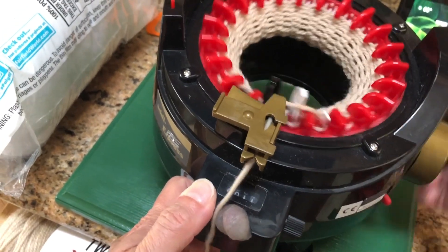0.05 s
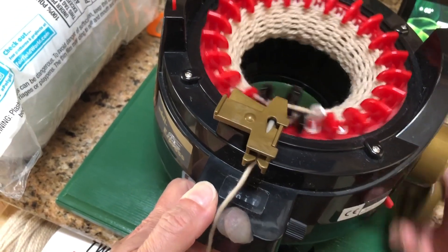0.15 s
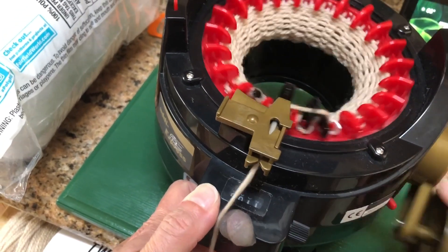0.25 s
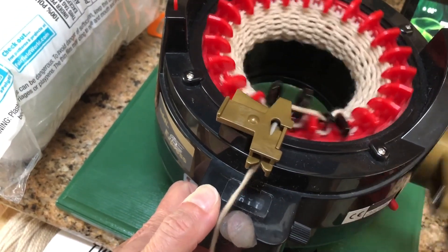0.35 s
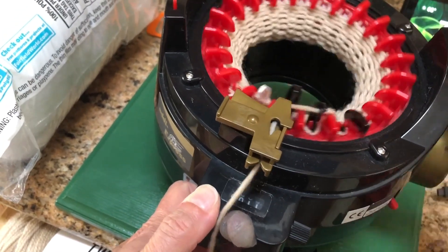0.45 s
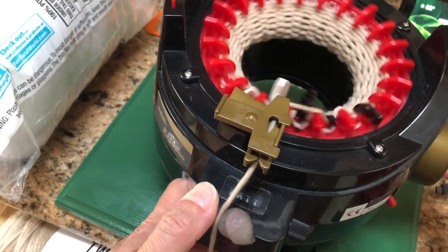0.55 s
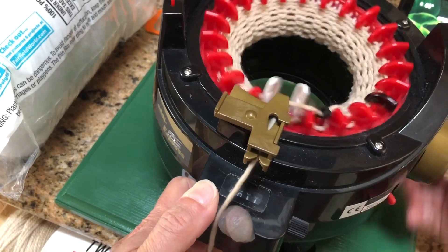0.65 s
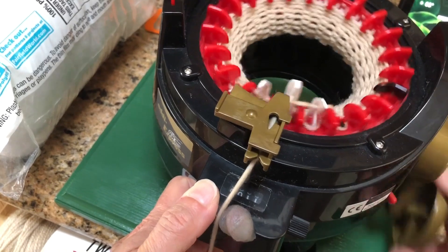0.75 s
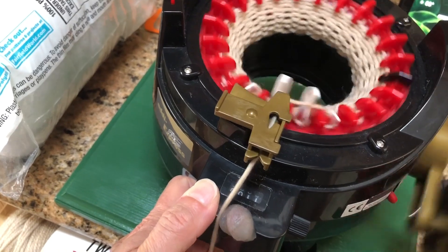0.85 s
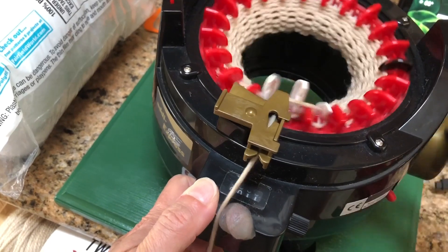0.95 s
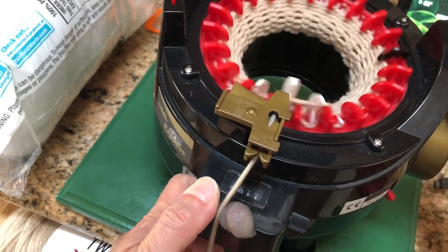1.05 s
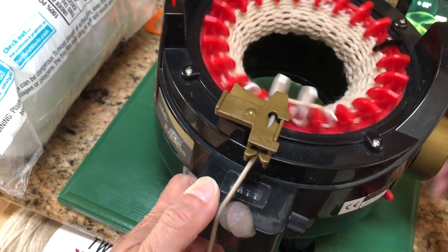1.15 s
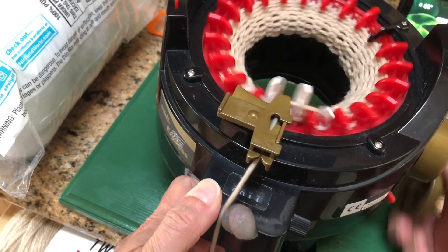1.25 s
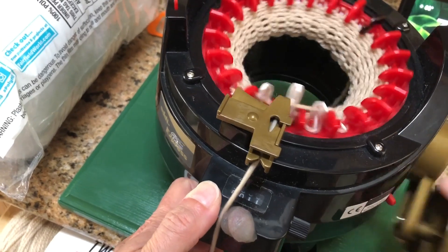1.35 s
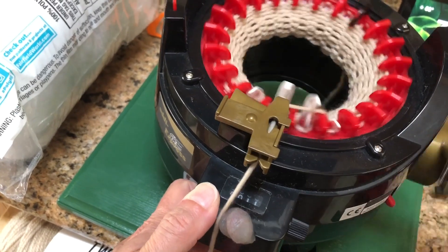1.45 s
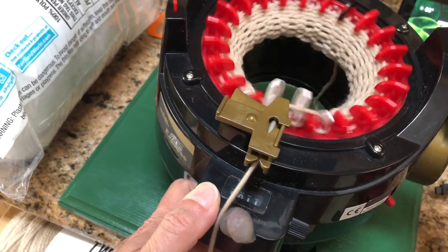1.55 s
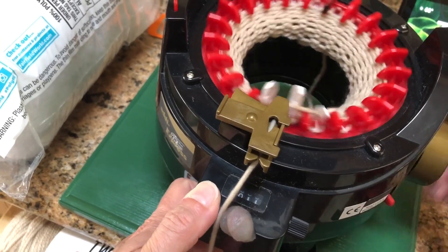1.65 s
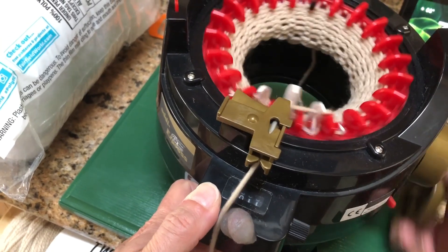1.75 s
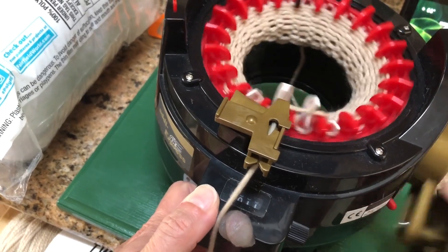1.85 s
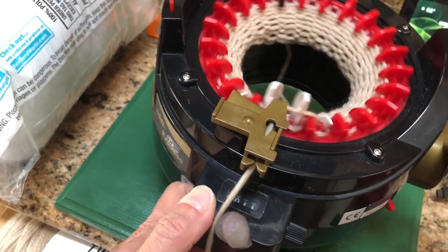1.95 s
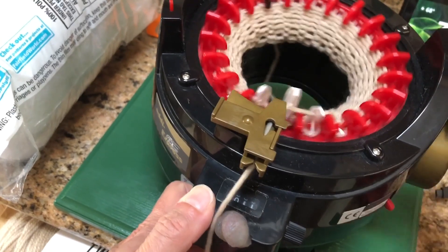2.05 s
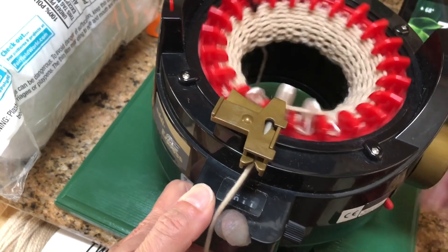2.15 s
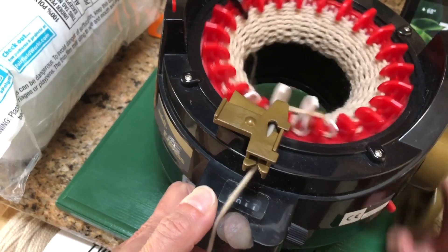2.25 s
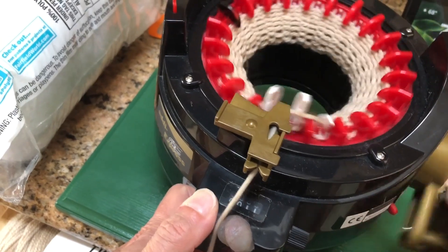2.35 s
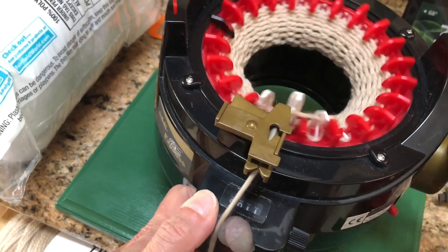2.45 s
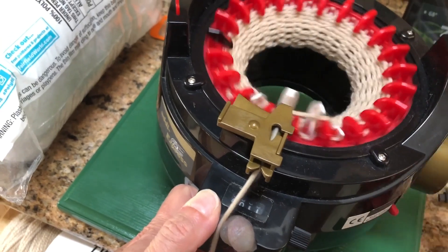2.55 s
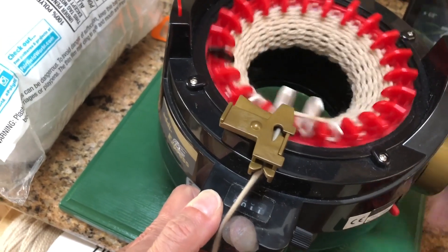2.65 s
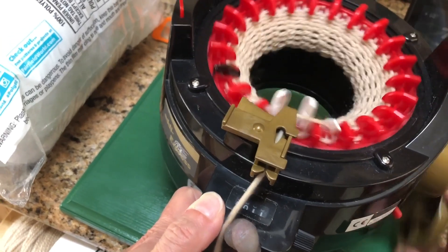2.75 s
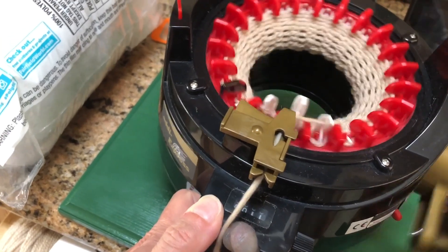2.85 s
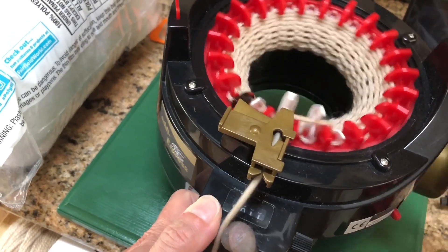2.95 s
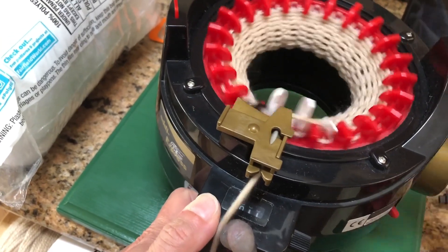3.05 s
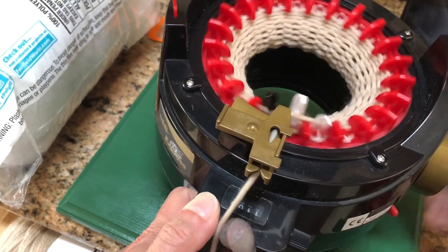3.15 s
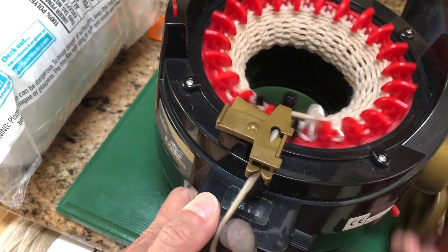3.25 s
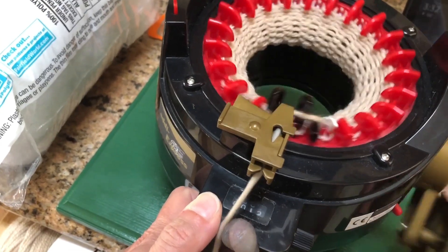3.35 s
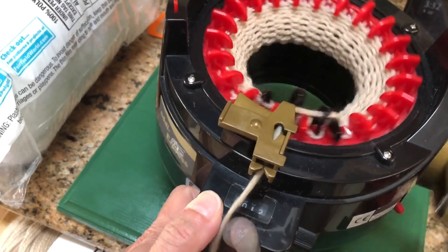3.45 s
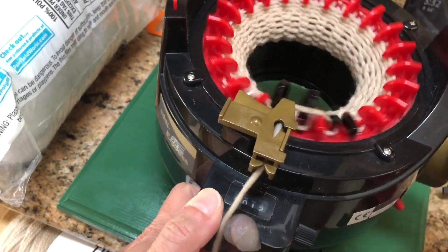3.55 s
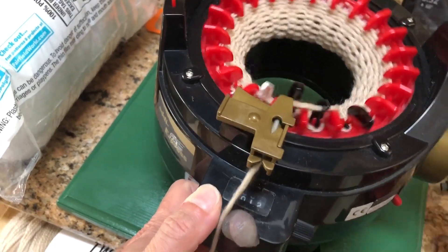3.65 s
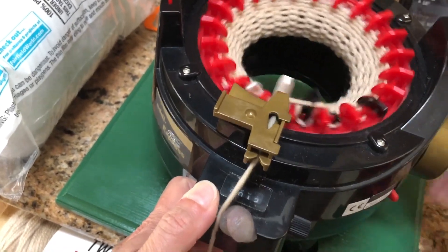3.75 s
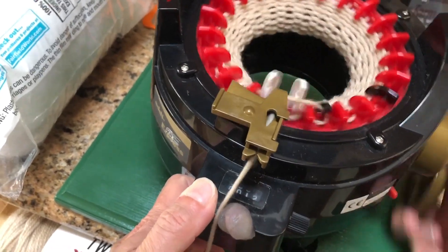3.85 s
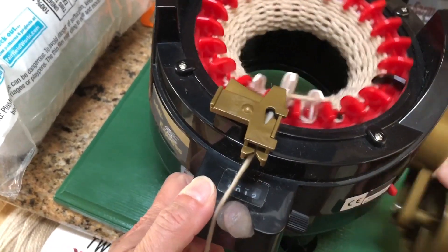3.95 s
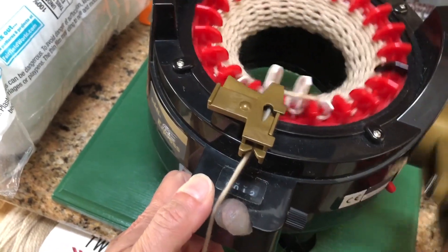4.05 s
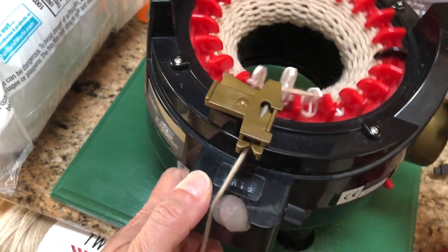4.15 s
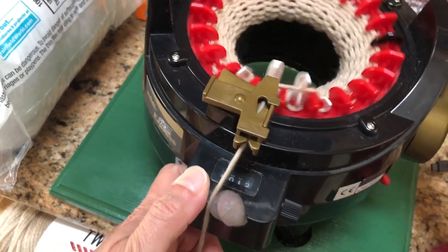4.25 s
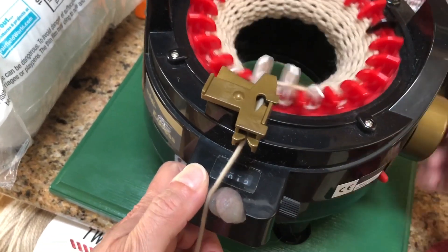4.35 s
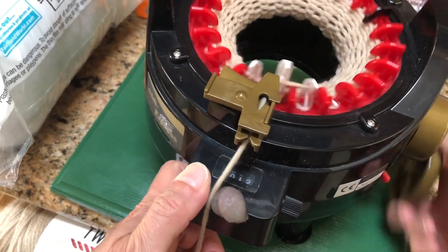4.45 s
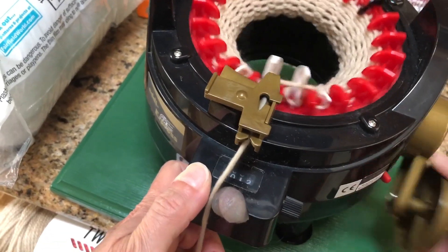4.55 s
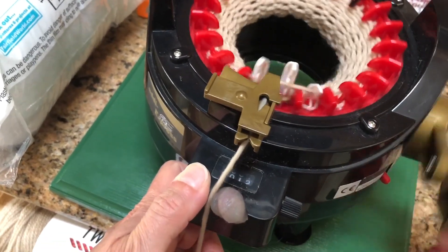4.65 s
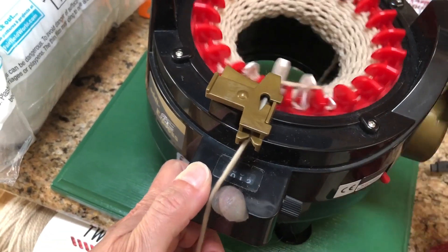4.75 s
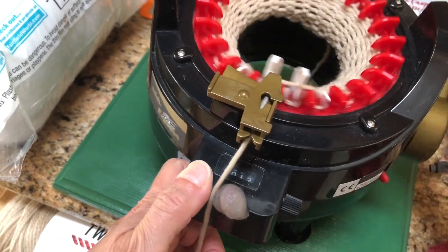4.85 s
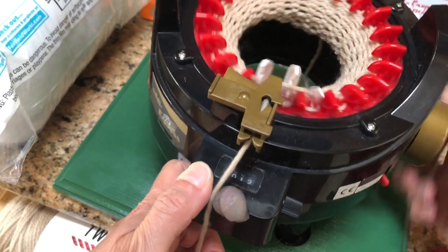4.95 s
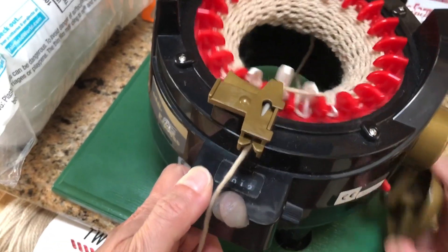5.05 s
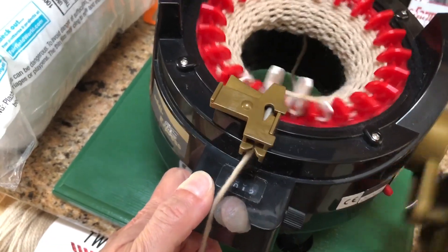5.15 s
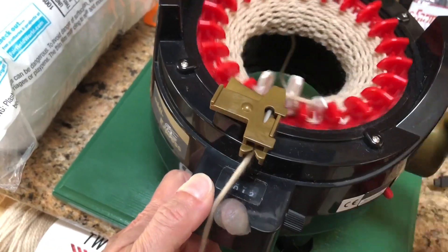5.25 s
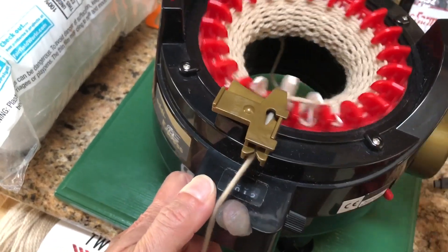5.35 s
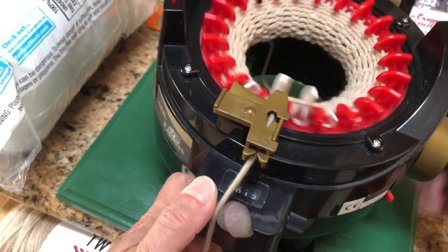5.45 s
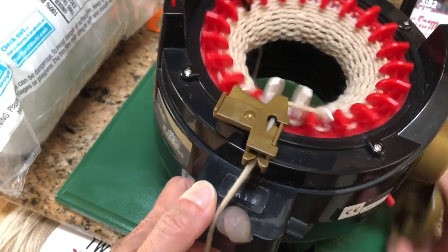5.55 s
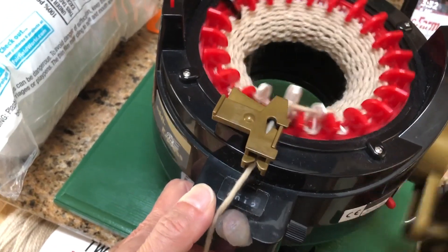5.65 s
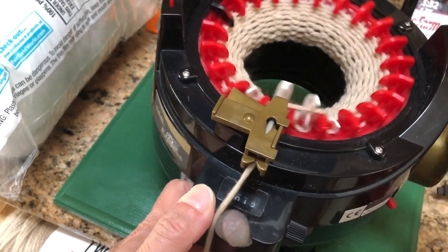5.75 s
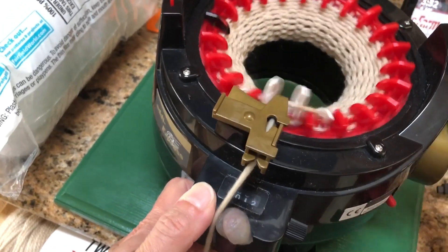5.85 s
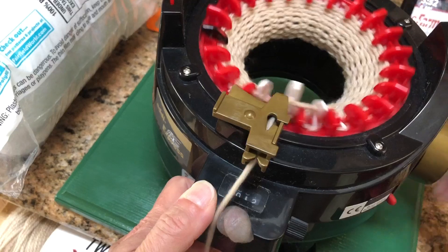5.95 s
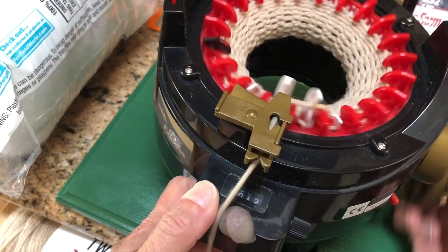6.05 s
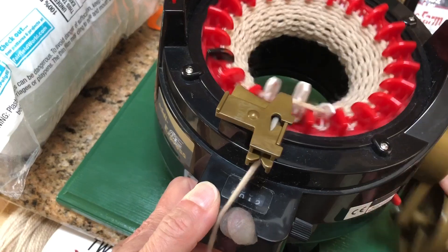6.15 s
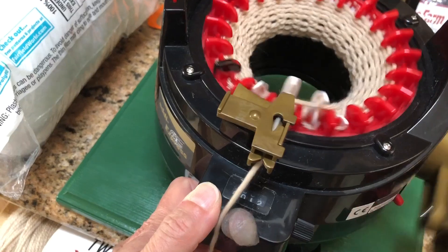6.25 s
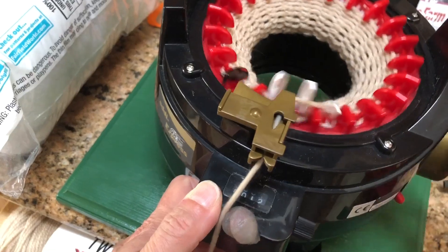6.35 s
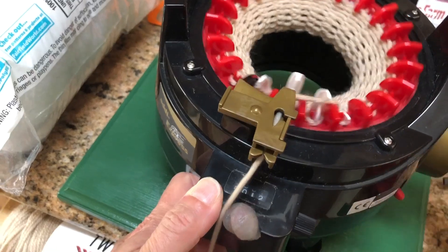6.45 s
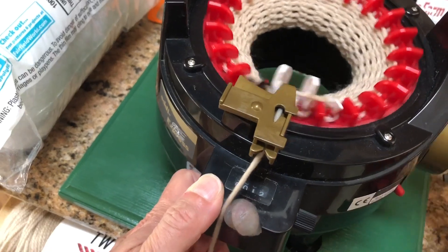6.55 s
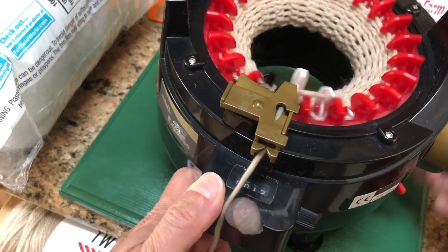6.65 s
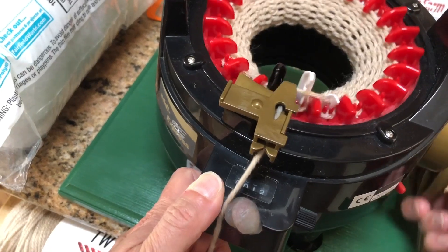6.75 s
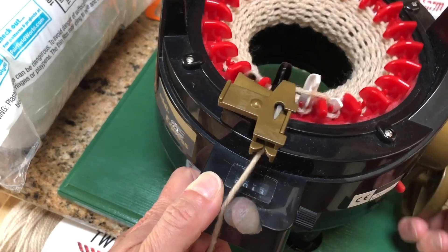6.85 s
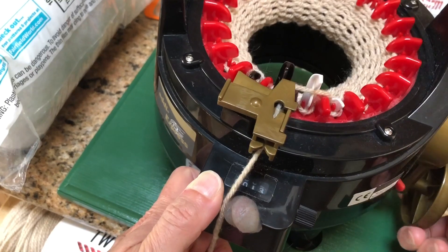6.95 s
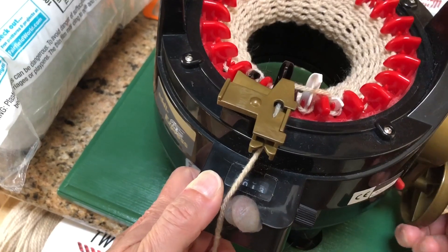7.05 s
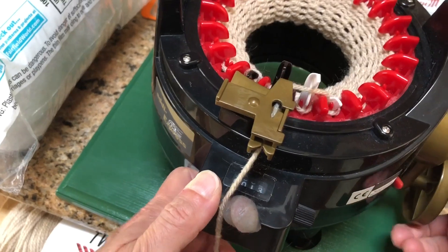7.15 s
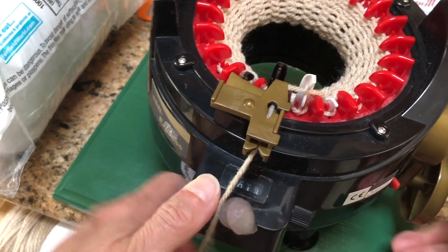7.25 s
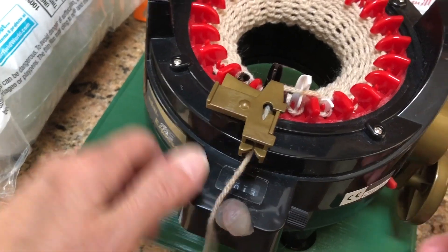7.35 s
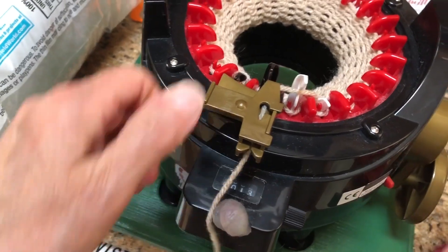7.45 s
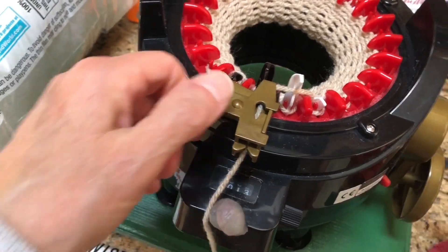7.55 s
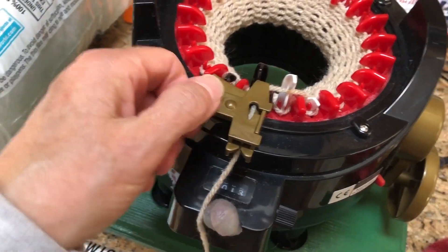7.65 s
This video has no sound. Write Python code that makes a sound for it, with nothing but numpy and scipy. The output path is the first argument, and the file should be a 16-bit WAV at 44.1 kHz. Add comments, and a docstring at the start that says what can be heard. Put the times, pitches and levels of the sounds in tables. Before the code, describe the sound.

Dry, clattering plastic machinery heard from close by, already turning at the start. Slightly irregular sharp clicks ride on rattling, rubbing and low rumble that swell with each push of the crank. Two hard snaps, about three seconds apart, jump well above the rest. Near the end the motion dies suddenly, with tiny ticks in a small quiet room with short faint reflections.

```python
"""Hook ticks, a gear knock and sharp needle clicks are heard first: a small plastic circular knitting
machine is cranked by hand, about seven needles a second passing the cam, heard from close by.
Stick-slip bursts and blows excite resonant plastic; filtered noise makes the rubbing, rumble and air.
The row counter snaps over twice; after a last double click the crank stops and a few faint ticks remain."""
import sys
import numpy as np
from scipy import signal
from scipy.fft import rfft, irfft
from scipy.io import wavfile
from scipy.ndimage import uniform_filter1d

SR = 44100
rng = np.random.default_rng(int(sys.argv[2]) if len(sys.argv) > 2 else 0)


def master_out(mix):
    """Clip the mix to full scale and print it as 16-bit PCM to the path in sys.argv[1]."""
    frames = np.transpose(np.atleast_2d(mix))
    ceiling = np.clip(frames, -1, 1)
    pcm = np.round(ceiling * 32767).astype(np.int16)
    wavfile.write(sys.argv[1], SR, pcm)


N = 338820
TIME = np.arange(N) / SR
TAPS = 4096  # length of one impact or impulse response, samples
HZ = np.fft.rfftfreq(TAPS, 1 / SR)
LEAD = .02  # scraping kept ahead of each catch, s

# False for a snag in between or a tick at rest:
# (t/s, level of the bright part/dB, length/s, hollow body/dB, top sparkle/dB, on the beat)
NEEDLE_CATCHES = [(.0612, -28, .0036, -17, 5, False), (.0686, -32, .0058, 3.5, -1, False),
                  (.1324, -32, .0084, -6, 5, True), (.2897, -28.5, .0042, -14, 8.5, True),
                  (.4555, -30.5, .0057, -9, 9, True), (.610, -33, .006, -5, 0, True),
                  (.7423, -36.5, .0085, -1, 0, True), (.866, -33.5, .0043, -7, 2, False),
                  (.895, -32.5, .0071, -2, 2, True), (1.0547, -34.5, .0085, 0, 3, True),
                  (1.193, -32.5, .0075, 0, 2, True), (1.335, -34.5, .0057, -3, 0, True),
                  (1.3967, -36, .009, 5, -10, False), (1.449, -37.5, .009, 0, -1, False),
                  (1.484, -36, .0056, -2.5, -1, True), (1.6225, -30.5, .0046, -2, 8, True),
                  (1.745, -33.5, .0064, -17, 3, True), (1.823, -34.5, .0042, 0, 0, False),
                  (1.888, -37, .008, -8, -7, True), (2.0327, -29.5, .0045, 4, 11, True),
                  (2.1674, -27, .004, -5.5, 3, True), (2.253, -36.5, .0057, -3, 9, False),
                  (2.2985, -35, .0054, -3, -3, True), (2.4266, -32.5, .0044, -11, 8, False),
                  (2.4379, -32, .006, -6.5, 4, True), (2.5826, -32.5, .0066, -4, 2, True),
                  (2.6994, -32.5, .0046, -11, 6, True), (2.7542, -24, .0024, -12, 0, False),
                  (2.8376, -35.5, .0053, 1, 3, True), (2.988, -37, .0062, -3, -8, True),
                  (3.0934, -32.5, .005, -4, -2, False), (3.123, -29.5, .0036, -12, -5, True),
                  (3.2117, -29, .0074, 2, 2, False), (3.273, -29, .003, -2, 19, True),
                  (3.281, -34, .0096, -4.5, 2, False), (3.46, -29, .0054, -14, 2, True),
                  (3.6453, -34.5, .0068, -22, 0, True), (3.785, -27, .004, -3, 3, True),
                  (3.886, -34.5, .005, -3, 7, False), (3.9173, -31.5, .0045, -16, -4, False),
                  (3.9494, -33, .004, -7, 3, True), (4.1156, -32.5, .0037, -1, -10, True),
                  (4.223, -35, .004, -11, 15, False), (4.2825, -36, .0086, -3, -3, True),
                  (4.3689, -33.5, .0046, -1, -6, False), (4.4245, -33.5, .004, -6, 0, True),
                  (4.523, -34, .0033, -20, -7, False), (4.5926, -31.5, .004, -8, -1, True),
                  (4.728, -38, .0074, 3, 0, True), (4.7597, -36.5, .0077, -8, -3, False),
                  (4.8996, -29, .005, -9, 8, True), (5.051, -36, .0067, -8, 6, True),
                  (5.173, -36.5, .006, 2, 4, False), (5.209, -32.5, .01, -6, 2, True),
                  (5.3524, -29.5, .004, -2.5, 9, True), (5.488, -29.5, .0046, -7, 3, True),
                  (5.6347, -31, .0066, 0, 7, True), (5.7854, -32.5, .006, -1, 6.5, True),
                  (5.885, -38, .0085, -5, -4, False), (5.94, -36, .0105, -4, 0, True),
                  (6.094, -42, .005, -4, -11, True), (6.2724, -34.5, .0047, -3, 4, True),
                  (6.457, -42, .0066, -3, -2, True), (6.6006, -35, .0037, -5, -2, False),
                  (6.6398, -35, .005, -1, 1, True), (6.808, -28, .0042, -5.5, 7, True),
                  (6.8224, -33, .0058, 3.5, 12.5, False), (6.953, -57, .004, 0, -8, False),
                  (7.067, -62, .007, 9, -18, False), (7.106, -60, .009, 12, -18, False),
                  (7.14, -65, .005, 7, -18, False), (7.188, -56, .006, -4, -14, False),
                  (7.6, -62, .012, 11, -3, False), (7.632, -63, .012, 6, 2, False)]
# resonances of the plastic housing, at full weight: (f/Hz, width/Hz, lift/dB)
HOUSING_MODES = [(605, 110, 5), (955, 70, 4), (1135, 50, 4), (1340, 130, 4), (1850, 90, 4), (2130, 110, 3),
                 (3045, 80, 5), (3480, 130, 5), (4000, 110, 4), (4200, 180, 3), (5360, 140, 4),
                 (8300, 900, 3), (9350, 350, 2), (11500, 1100, 3)]
# broad spectrum of needle and gear-tooth friction: (f/Hz, level/dB)
NEEDLE_COLOUR = [(60, -25.5), (250, -6), (500, 5.5), (1200, 7.5), (2200, 2), (4800, 2.5), (6500, -1.5),
                 (9500, -8), (12000, -5.5), (16000, -16)]


def gain_of(db):
    """Level definition: decibels to amplitude."""
    return 10 ** (np.asarray(db) / 20)


def evened(x):
    """Normalization: scales to rms 1."""
    return x / np.sqrt(np.mean(x ** 2) + 1e-20)


def read(points, hz=HZ):
    """Interpolation of (f/Hz, value) points on a logarithmic frequency axis."""
    f, value = np.transpose(points)
    return np.interp(np.log(hz + 1), np.log(f + 1), value)


def lifts(modes):
    """Resonance: each mode raises the spectrum in dB by a bell-shaped peak about its frequency."""
    return sum(db / (1 + (2 * (HZ - hz) / width) ** 2) for hz, width, db in modes)


def uneven(order):
    """Local modal response: a random dB ripple of rms 1, smoothed over this many bins."""
    return evened(uniform_filter1d(rng.standard_normal(len(HZ)), order))


def causal(db):
    """Minimum phase: the Hilbert transform of log gain gives a body that rings only after it is struck."""
    log_gain = np.log(gain_of(np.r_[db, db[-2:0:-1]]))
    return np.exp(np.conj(signal.hilbert(log_gain)))[:len(db)]


def bending(delay):
    """Dispersion: bending waves run faster when higher, so a blow falls in pitch; delay/s is at 1 kHz."""
    return np.exp(-4j * np.pi * delay * np.sqrt(1000 * HZ))


def coloured(x, response):
    """Linear filtering: convolves x with an impulse response and scales it to rms 1."""
    return evened(signal.oaconvolve(x, irfft(response))[:N])


def add(mix, s, sound, db, length):
    """Energy scaling: adds a sound at s with the energy of a level db held for length seconds."""
    part = mix[max(round(s * SR), 0):][:len(sound)]
    scale = gain_of(db) * np.sqrt(length * SR / np.sum(sound ** 2))
    part += (sound * scale)[:len(part)]


def slip(length, grain_db, scrape_db, scrape_s, rise_share=0.21, fall_share=0.99):
    """Stick-slip friction: spectrum of tiny random impacts, a soft scrape with a hard catch in its middle."""
    t, length = np.arange(TAPS) / SR - LEAD, max(length, .002)
    catch = np.exp(-np.logaddexp(-t / (rise_share * length), t / (fall_share * length)))
    scrape = gain_of(scrape_db) * np.exp(-abs(t) / scrape_s)
    sign, size = rng.standard_normal((2, TAPS))
    impacts = np.sign(sign) * gain_of(grain_db * np.clip(size, -2, 2))
    return rfft(impacts * np.hypot(catch, scrape))


def beats():
    """Periodic excitation: the needle times, with one before the start since the ring already turns."""
    times = [row[0] for row in NEEDLE_CATCHES if row[-1]]
    return np.array([2 * times[0] - times[1]] + times)


def turning(follow, swing_db, peak_phase):
    """Amplitude modulation: rubbing follows the hand's effort, swells once a needle and dies at rest."""
    # how hard the hand drives the crank, before each sound takes its share: (t/s, effort/dB)
    effort = [(0, 3), (.25, -0.5), (.42, -3.5), (.62, -0.5), (.85, -1), (1.08, -4), (1.3, -2), (1.42, 0),
              (1.72, -0.5), (2.02, -5.5), (2.2, 2), (2.4, -2), (2.7, 1), (3.02, -2), (3.19, 2.5),
              (3.34, -2), (3.56, -2.5), (3.78, 2.5), (4.02, -2), (4.48, -4), (5.17, -2), (5.65, -0.5),
              (6.2, -4), (6.6, -5.5)]
    slow_s, slow_db_per_s = 6.67, 70  # from here the crank slows and the rubbing fades
    rest_s, rest_fade_s = 6.95, .015  # the ring comes to rest
    drive_db = follow * np.interp(TIME, *np.transpose(effort))
    drive_db = drive_db - slow_db_per_s * np.maximum(TIME - slow_s, 0)
    needle_times = beats()
    phase = np.interp(TIME, needle_times, np.arange(len(needle_times)))
    swell_db = swing_db * np.cos(2 * np.pi * (phase - peak_phase))
    rest = np.exp(-np.maximum(TIME - rest_s, 0) / rest_fade_s)
    return gain_of(drive_db + swell_db) * rest


def jostle(depth_db, size=800):
    """Slow random modulation: loose parts chatter in clumps with lulls between them; rms 1."""
    drift = evened(signal.oaconvolve(rng.standard_normal(N), signal.windows.hann(size), "same"))
    return evened(gain_of(depth_db * np.clip(drift, -2, 1.3)))


def heaving(rock_s=.035):
    """Energy summation: the rocking level, a short Gaussian swell for each heave of the crank."""
    # the crank heaves and the machine rocks on its legs: (t/s, level/dB)
    heaves = [(.08, -54), (.21, -52), (.58, -50), (.73, -54), (1.41, -53), (1.52, -65), (1.69, -50),
              (1.77, -55), (1.94, -55), (2.02, -52), (2.21, -54), (2.69, -51), (2.9, -52), (3.2, -50),
              (3.44, -51), (3.77, -49), (4.15, -62), (4.62, -56), (4.8, -59), (4.99, -56), (5.1, -59),
              (5.2, -53.5), (5.34, -56), (5.47, -50), (5.57, -57), (5.75, -63), (6.04, -49), (6.4, -57)]
    return np.sqrt(sum(gain_of(db) ** 2 * np.exp(-((TIME - s) / rock_s) ** 2) for s, db in heaves))


def clicks(rows, early=.0014, own_db=2.0, creep_s=.03, snap_db=-6.0):
    """Stick-slip release: needles scrape, catch and ring the housing; short catches snap, long ones creep."""
    quick_catch_s, snap_late_s = .004, .0008  # catches this short snap fully, this long after the catch
    out, body = np.zeros(N), read(NEEDLE_COLOUR) + lifts(HOUSING_MODES)
    low = 1 / (1 + (HZ / 1900) ** 4)
    top = 1 - 1 / (1 + (HZ / 7200) ** 4)
    snap = gain_of(snap_db) * np.exp(-2j * np.pi * HZ * (LEAD + snap_late_s))
    for s, db, length, body_db, top_db, _ in rows:
        colour = body + own_db * uneven(order=24) + low * body_db + top * top_db
        grains = slip(length, grain_db=7.5, scrape_db=-18.5, scrape_s=0.0035,
                      rise_share=length / creep_s, fall_share=0.81)
        snap_share = min(quick_catch_s / length, 1) ** 2
        force = (grains / np.std(grains) + snap * snap_share) * causal(colour)
        # the level is that of the bright part; the hollow body comes on top of it
        bright_energy = np.sum(abs(force * (1 - low)) ** 2)
        extra_db = 10 * np.log10(np.sum(abs(force) ** 2) / bright_energy)
        add(out, s - LEAD - early, irfft(force), db + extra_db, length)
    return out


def hooks(length=0.0044, top_db=-6.5, top_spread_db=4):
    """Impact excitation: neighbouring hooks tick against their slots, each with a ring of its own."""
    # lighter ticks between the clicks: (t/s, level of the bright part/dB, hollow body/dB)
    ticks = [(.010, -45, 4), (0.35, -41.5, -10), (.390, -35, -20), (.519, -45.5, 5), (.261, -38, 2.5),
             (.373, -47, -8), (.433, -51, -12), (.677, -45, -6), (.762, -44, 3), (0.839, -39, -4),
             (1.029, -45, -13), (1.433, -38, -12), (1.517, -43, 10), (1.595, -34, -13), (2.142, -37, -6),
             (2.201, -43, -4), (2.663, -38.5, 0), (2.796, -44, -6), (2.807, -49, -8), (3.048, -45, 4),
             (3.703, -45, 2), (4.063, -47, -10), (4.412, -47, -4), (4.502, -51, -14), (4.798, -44, 6),
             (4.932, -43, 4), (5.011, -47, -13), (5.335, -41, -13), (5.596, -43, -6), (6.077, -43, 2),
             (6.394, -43, -6), (6.536, -42, -3), (.707, -47, -12), (0.996, -40, -29), (1.144, -38.5, -3),
             (1.168, -34, -9), (1.254, -42.5, -17), (1.290, -41.5, -16), (1.370, -42, 8), (1.658, -35, -2),
             (1.798, -36.5, -2), (1.837, -38, 1), (1.851, -42, 1), (1.989, -41.5, -10), (2.215, -37, -12),
             (2.369, -46, 2), (2.393, -40, -11), (2.535, -35, -4), (2.826, -37.5, -2), (2.939, -41, -21),
             (3.392, -38.5, -4), (3.578, -40, -7), (4.044, -37.5, -5), (4.079, -45, -2), (4.102, -46, -1),
             (4.21, -40.5, -7), (4.3413, -41, 5.5), (4.387, -36.5, -12), (4.4387, -45, 0), (4.559, -40, -8),
             (4.639, -38, 6.5), (4.820, -42, -4), (4.878, -34, -3), (4.952, -40.5, -3), (4.9815, -44, -7),
             (5.022, -37, -11), (5.146, -38, -1), (5.238, -42, -11), (5.267, -37, -21), (5.316, -46, -15),
             (5.457, -37.5, -8), (5.5678, -35.5, -11), (5.671, -47, 5), (6.624, -42.5, 0)]
    tops = top_db + top_spread_db * rng.standard_normal(len(ticks))
    rows = [(s, db, length, body_db, top, False) for (s, db, body_db), top in zip(ticks, tops)]
    return clicks(rows, own_db=4.5)


def gears(delay=0.002596, length=0.029, early=.0033, ring_db=7, low_width_hz=150, high_width_hz=240,
          scuff_db=-15, scuff_late=0.00067, bounce_db=-12, bounce_s=0.0026):
    """Dispersive impact: teeth strike the housing as falling chirps, with a local ring, bounce and scuff."""
    # gear teeth taking up their slack: (t/s, level/dB, brightness/dB, lower ring f/Hz, upper ring f/Hz)
    knocks = [(0.0372, -38, 23, 780, 1080), (0.185, -52, 2, 570, 1150), (0.2194, -50, 6, 650, 950),
              (0.2632, -47, 1, 480, 960), (0.609, -49, 8, 620, 1010), (0.644, -45, 0, 730, 1000),
              (0.7636, -45, 15, 620, 960), (0.8259, -35.5, 1, 675, 1000), (0.84, -42.5, -14, 453, 940),
              (0.8696, -45, 0, 640, 920), (0.9842, -43, -7, 610, 960), (1.0286, -46, 5, 410, 1000),
              (1.2388, -45.5, -7, 670, 930), (1.355, -53, 5, 610, 960), (1.4062, -38.0, 9, 540, 1390),
              (1.4286, -43, -4, 580, 960), (1.554, -50, 4, 590, 980), (1.6111, -42, -4, 640, 1380),
              (1.652, -42, 9, 700, 960), (1.687, -28.5, 13, 615, 1400), (1.728, -31, 7, 590, 1330),
              (1.855, -42, 1, 640, 1350), (1.909, -41, 30, 560, 1430), (1.9327, -47, 4, 640, 1220),
              (1.963, -31, 4, 695, 1260), (2.132, -39, 4, 700, 940), (2.2016, -44, -2, 650, 960),
              (2.358, -48, 5, 680, 1270), (2.519, -41.5, 7, 684, 930), (2.609, -53, -13, 670, 1000),
              (2.63, -43.5, -5, 440, 1000), (2.6536, -44, 7, 550, 950), (2.6686, -42, 16, 650, 970),
              (2.6896, -42.5, 13, 530, 970), (2.703, -43, 21, 510, 1360), (2.8727, -34.5, 19, 390, 1420),
              (2.921, -31.5, 4, 624, 1270), (3.0295, -45.5, -1, 645, 1040), (3.135, -42, 16, 700, 960),
              (3.1747, -37, 7, 590, 950), (3.4051, -45, 1, 710, 1010), (3.435, -42, -6, 650, 930),
              (3.7287, -41, -4, 420, 1260), (3.759, -32, 12, 473, 1070), (3.797, -46, 8, 770, 1040),
              (4.078, -48.5, 11, 730, 970), (4.1501, -49, 7, 690, 980), (4.1855, -46, 3, 594, 1140),
              (4.518, -44.0, -10, 640, 1130), (4.6294, -38.5, 20, 390, 1430), (4.69, -48, 1, 645, 890),
              (4.8263, -41, 2, 586, 1450), (4.8393, -45, 2, 590, 990), (4.882, -32, 2, 607, 1400),
              (5.0338, -34.5, 7, 596, 1370), (5.1, -45, -2, 640, 880), (5.136, -42, -2, 594, 950),
              (5.16, -39, 0, 670, 1380), (5.1795, -45, -1, 550, 970), (5.289, -35.5, 5.5, 690, 950),
              (5.408, -45, -13, 536, 890), (5.496, -46.5, 7, 480, 1350), (5.52, -45, 5, 610, 980),
              (5.663, -49, -1, 686, 1340), (5.674, -43.5, 2, 610, 1440), (5.9662, -45, 0, 645, 1150),
              (6.3044, -44, 10, 410, 960), (6.3677, -36.5, 7, 670, 940), (6.5298, -41.5, 7, 600, 1370),
              (6.5512, -39.5, 0, 610, 1200), (6.7401, -46.5, 15, 620, 1350), (6.834, -48, 19, 624, 1260)]
    # broad spectrum of the blows: (f/Hz, level/dB)
    knock_colour = [(50, -14.5), (130, -18.5), (270, -18), (420, -2), (620, 1), (850, -5), (1300, -5.5),
                    (1550, -9), (2000, -15.5), (4000, -24), (8000, -34.5)]
    out, body = np.zeros(N), read(knock_colour) + .3 * lifts(HOUSING_MODES)
    upper = 1 - 1 / (1 + (HZ / 850) ** 4)
    bright = causal(read(NEEDLE_COLOUR) + lifts(HOUSING_MODES)) / np.hypot(1, HZ / 5000)
    for s, db, bright_db, low_hz, high_hz in knocks:
        path, gap = rng.uniform(.7, 1.3, 2)  # each blow has its own distance and bounce time
        bounce = 1 + gain_of(bounce_db) * np.exp(-2j * np.pi * HZ * bounce_s * gap)
        spot = lifts([(low_hz, low_width_hz, ring_db), (high_hz, high_width_hz, ring_db)])
        struck = causal(body + spot + 1.3 * uneven(order=14) + upper * bright_db)
        blow = struck * bending(delay * path) * bounce
        add(out, s - early - delay * (path - 1), irfft(blow), db, length)
        scuff = slip(0.013, grain_db=1.0, scrape_db=-13.5, scrape_s=0.005, rise_share=.08) * bright
        add(out, s - LEAD - scuff_late, irfft(scuff), db + scuff_db, length)
    return out


def row_counter(early=0.00048, own_db=7.0, spread_db=4, count=8):
    """Sudden release of strain: a sprung pawl cracks on plastic; hard strikes set loose parts chattering."""
    # the row counter slips, strikes home and rebounds: (t/s, level/dB, length/s)
    snaps = [(0.5572, -13.5, 0.0022), (0.5622, -5, 0.001), (0.571, -19.5, 0.0021), (0.5833, -22.5, 0.002),
             (0.5883, -18, .0018), (0.6075, -27, 0.002), (0.61, -40.5, .002), (0.624, -33, .002),
             (3.738, -13.5, 0.0008), (3.743, -5.5, 0.0015), (3.759, -38.5, 0.0023), (3.7663, -19.5, .002),
             (3.77, -25, .002)]
    # resonances of the row counter: (f/Hz, width/Hz, lift/dB)
    counter_modes = [(480, 70, 4), (780, 80, 4), (1140, 70, 3), (1620, 80, 3), (1850, 100, 5),
                     (2150, 140, 3), (2830, 100, 4), (3050, 130, 3), (3540, 90, 3), (3780, 170, 3),
                     (5610, 150, 6), (8100, 900, 3), (9600, 400, 2)]
    # broad spectrum of the strike: (f/Hz, level/dB)
    snap_colour = [(50, -14.5), (180, -22), (330, -13.5), (600, -10), (950, -3.5), (1300, -1), (1900, 0.5),
                   (2500, -2), (4000, -1.5), (5500, -3.5), (7800, -5), (12000, -11.5), (16000, -17)]
    # change of spectrum for rebounds and chatter: (f/Hz, level/dB)
    chatter_tilt = [(300, 2.5), (1000, 10), (2200, -7.5), (5600, 2), (7000, -6), (16000, -2.5)]
    strike_s, hard_db, rebound_db = .0004, -8.5, -17  # strikes at or below rebound_db are rebounds
    chatter_db, chatter_db_per_s, chatter_s, tick_s = -21, 145, .13, .0014
    colour = read(snap_colour) + lifts(counter_modes)
    loose = colour + read(chatter_tilt)
    out = np.zeros(N)
    for s, db, length in snaps:
        crack = slip(length, grain_db=4.5, scrape_db=-32.0, scrape_s=0.0014,
                     rise_share=0.22, fall_share=1.6)
        body = colour if db > rebound_db else loose + .6 * own_db * uneven(order=40)
        add(out, s - LEAD - early, irfft(crack * causal(body)), db, length)
        if db > hard_db:
            add(out, s - early, irfft(causal(colour)), db, strike_s)  # the clean snap
            # one tick at a random time in each equal slice of the chatter
            for late in chatter_s * (np.arange(1, count + 1) + rng.random(count)) / count:
                grains = slip(tick_s, grain_db=8.0, scrape_db=-26.5, scrape_s=.001)
                tick = grains * causal(loose + own_db * uneven(order=40))
                level = db + chatter_db - chatter_db_per_s * late + spread_db * rng.uniform(-0.89, 1)
                add(out, s + late - LEAD, irfft(tick), level, tick_s)
    return out


def rattle(level_db=-46.5, per_s=210, spread_db=2.0, delay=.003, own_db=4, count=14):
    """Random impact train: loose needles knock at several places round the ring, each path dispersive."""
    # broad spectrum of the small knocks: (f/Hz, level/dB)
    rattle_colour = [(50, -30), (160, -15.5), (250, -10.5), (330, 2.5), (450, 1), (650, 0), (850, -2.5),
                     (1350, -5), (1900, -10), (4000, -18), (9000, -21.5), (16000, -48)]
    out, body = np.zeros(N), read(rattle_colour) + lifts(HOUSING_MODES)
    for path in np.linspace(.5, 1.5, count):
        blows = (rng.random(N) < per_s / count / SR) * rng.choice([-1, 1], N)
        blows = blows * gain_of(spread_db * np.clip(rng.standard_normal(N), -2, 1.5))
        out += coloured(blows, causal(body + own_db * uneven(order=16)) * bending(delay * path))
    motion = jostle(depth_db=4.0) * turning(follow=1.7, swing_db=3.5, peak_phase=0.38)
    return gain_of(level_db) * evened(out) * motion


def grinding(level_db=3.0, per_s=130, wander=.25, spread_db=3, delay=.002):
    """Stick-slip judder: in each heave the loaded teeth slip over each other quickly and unevenly."""
    # broad spectrum of the grinding teeth: (f/Hz, level/dB)
    grind_colour = [(50, -27), (160, -5), (240, -10), (330, -3), (600, 0.5), (900, -6), (1500, -12),
                    (4000, -21.5), (12000, -45)]
    drift = evened(uniform_filter1d(rng.standard_normal(N), size=400))
    slip_count = np.floor(np.cumsum(per_s * np.exp(wander * drift)) / SR)
    slips = np.diff(slip_count, prepend=0)
    slips = slips * gain_of(spread_db * np.clip(rng.standard_normal(N), -2, 1.5))
    body = causal(read(grind_colour) + lifts(HOUSING_MODES)) * bending(delay)
    return gain_of(level_db) * coloured(slips, body) * heaving()  # level is relative to the heaves


def scratches(level_db=-48.5, per_s=50, spread_db=3, dull_hz=5000, count=10):
    """Friction noise bursts: other needles scrape between the clicks, each place with its own colour."""
    out, body = np.zeros(N), read(NEEDLE_COLOUR) + lifts(HOUSING_MODES)
    for reach in np.geomspace(.5, 2, count):
        sizes = gain_of(spread_db * np.clip(rng.standard_normal(N), -2, 1.2))
        starts = (rng.random(N) < per_s / count / SR) * sizes
        u = np.arange(TAPS) / SR / rng.uniform(.0006, .003)  # each swells for a few milliseconds
        bursts = signal.oaconvolve(starts, u ** 2 * np.exp(-u))[:N] * rng.standard_normal(N)
        place = causal(body + 3.9 * uneven(order=40)) / np.hypot(1, HZ / (dull_hz * reach))
        out += coloured(bursts, place)
    motion = jostle(depth_db=1.5, size=1200) * turning(follow=0.73, swing_db=4.5, peak_phase=0.62)
    return gain_of(level_db) * evened(out) * motion


def sliding(level_db=-48.5, grain_db=4, flutter_db=1.5):
    """Sliding friction: plastic on plastic gives a fine, uneven broadband hiss."""
    # broad spectrum of the hiss: (f/Hz, level/dB)
    hiss_colour = [(100, -4.5), (500, 9), (1500, 2), (2500, -1), (4500, -1.5), (6500, -3.5), (8500, -2.5),
                   (10500, -7), (16000, -9)]
    flutter = evened(uniform_filter1d(rng.standard_normal(N), size=260))
    grains = rng.standard_normal(N) * gain_of(grain_db * rng.standard_normal(N) + flutter_db * flutter)
    hiss = coloured(grains, causal(read(hiss_colour) + 0.39 * lifts(HOUSING_MODES)))
    return gain_of(level_db) * hiss * turning(follow=0.22, swing_db=0.8, peak_phase=0.73)


def rumble(level_db=-58.5):
    """Low-frequency vibration: the machine shakes on its legs and rocks harder with each heave."""
    # broad spectrum of the shaking: (f/Hz, level/dB)
    rumble_colour = [(20, -63.5), (35, -2.5), (52, -9.5), (88, 4.5), (102, 2), (122, 5.5), (160, -7.5),
                     (250, -7), (500, -15), (2000, -80)]
    steady = gain_of(level_db) * turning(follow=0.41, swing_db=0.9, peak_phase=1.0)
    shaking = coloured(rng.standard_normal(N), causal(read(rumble_colour)))
    return shaking * np.hypot(steady, heaving())


def air(air_db=-62.5, hum_hz=120, hum_db=-73):
    """Stationary background: filtered room noise with a faint sinusoidal mains hum."""
    # broad spectrum of the quiet room: (f/Hz, level/dB)
    air_colour = [(20, -24), (60, -5), (120, 1), (200, -3), (320, -2), (600, -7), (1100, -13), (2000, -24),
                  (5000, -25), (10000, -31), (16000, -33)]
    hum = gain_of(hum_db) * evened(np.sin(2 * np.pi * hum_hz * TIME))
    return gain_of(air_db) * coloured(rng.standard_normal(N), causal(read(air_colour))) + hum


def room(x, first=0.0028, dull_hz=7500, count=3):
    """Diffuse reverberation: each band decays at its own rate; the reflection pattern shifts steadily."""
    # reverberation time of the room: (f/Hz, t60/s)
    decay_times = [(100, .3), (500, .33), (1500, .35), (5000, .33), (9000, .28), (16000, .2)]
    out = np.zeros(N)
    for k in range(count):
        hz, t, z = signal.stft(rng.standard_normal(SR // 2), SR, nperseg=256)
        z = z * gain_of(-60 * t / read(decay_times, hz)[:, None])
        tail = signal.istft(z / np.hypot(1, (hz / dull_hz) ** 2)[:, None], SR, nperseg=256)[1]
        # silent until the first reflection, then fading in over as long again
        tail = tail * np.clip(np.arange(len(tail)) / SR / first - 1, 0, 1)
        share = np.sqrt(2 / count) * np.cos(np.pi * (3 * TIME + k / count))
        out += signal.fftconvolve(x * share, tail / np.linalg.norm(tail))[:N]
    return out


def scene(wet_db=-16, counter_wet_db=-14.5):
    """Superposition of direct and reflected sound; the row counter, inside the housing, is more diffuse."""
    hits = clicks(NEEDLE_CATCHES) + hooks() + gears()
    snaps = row_counter()
    reflections = room(gain_of(wet_db) * hits + gain_of(counter_wet_db) * snaps)
    rubbing = rattle() + grinding() + scratches() + sliding()
    return (hits + snaps + reflections + rubbing + rumble() + air())[None]


def record(dry, low_hz=42, edge_hz=16300):
    """Transducer limits: the microphone's bass roll-off, its overload limit, then the band limit."""
    high_pass = signal.butter(N=3, Wn=low_hz, btype="high", fs=SR, output="sos")
    thinned = signal.sosfilt(high_pass, dry)
    edge = signal.firwin(511, edge_hz, window=("kaiser", 9), fs=SR)
    return signal.oaconvolve(np.clip(thinned, -.9, .9), edge[None], "same")


dry = scene()
out = record(dry)
master_out(out)
```